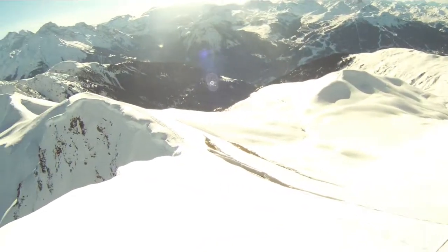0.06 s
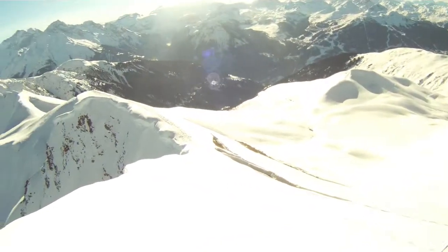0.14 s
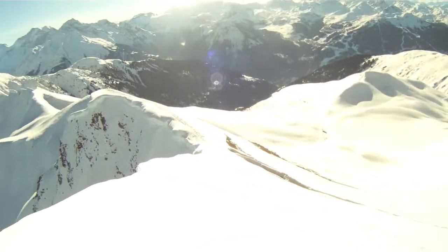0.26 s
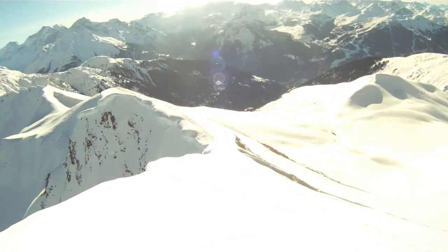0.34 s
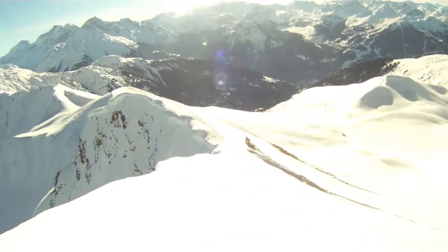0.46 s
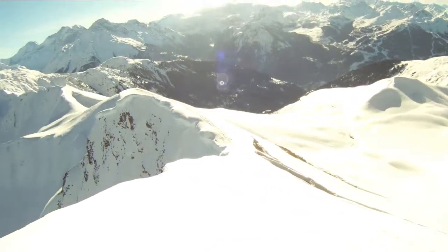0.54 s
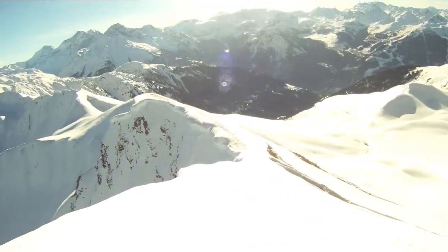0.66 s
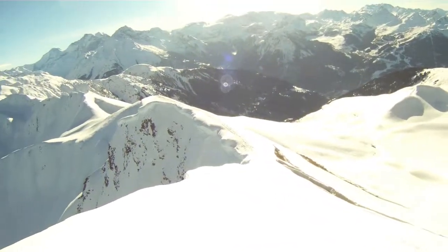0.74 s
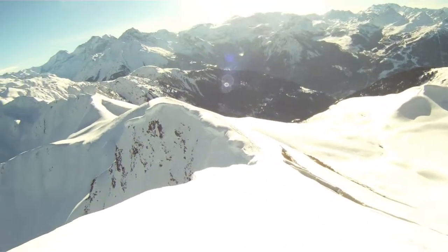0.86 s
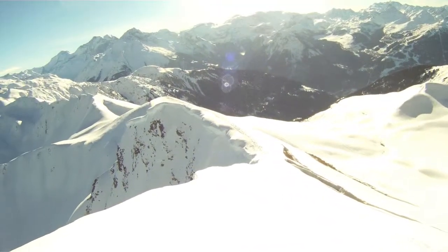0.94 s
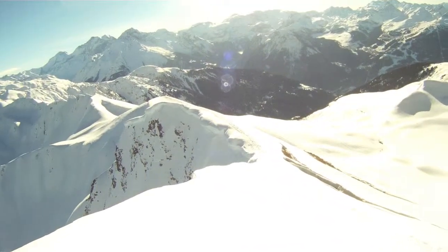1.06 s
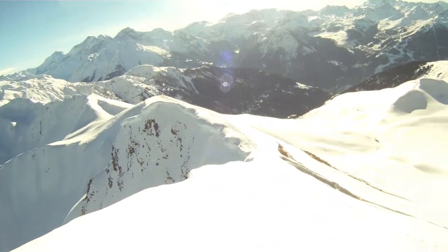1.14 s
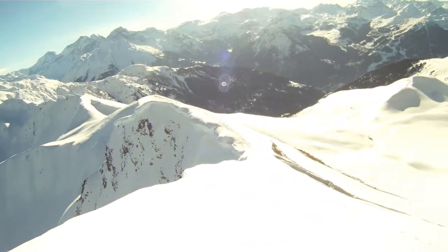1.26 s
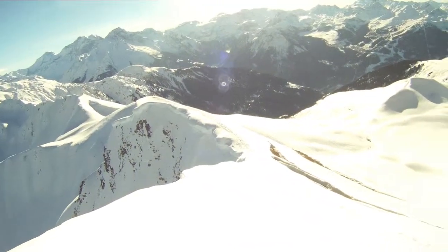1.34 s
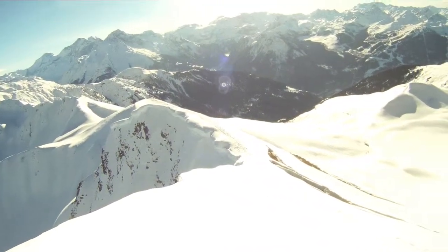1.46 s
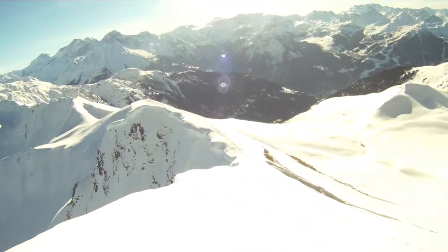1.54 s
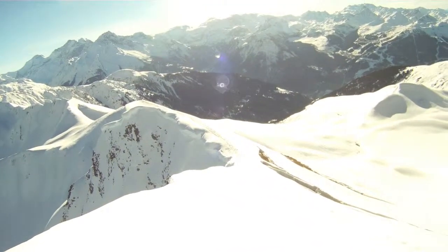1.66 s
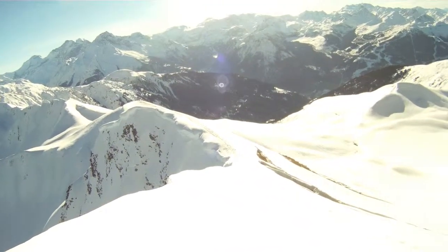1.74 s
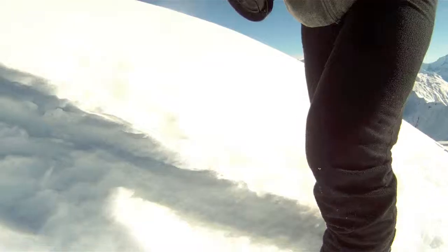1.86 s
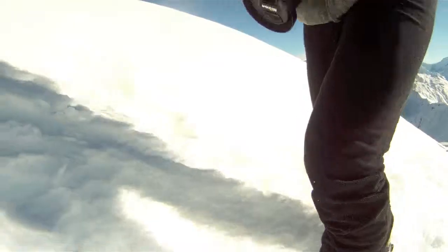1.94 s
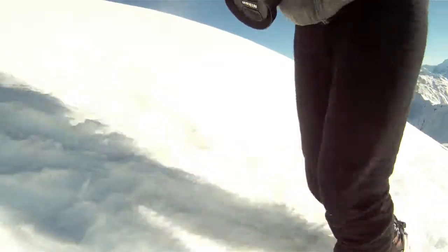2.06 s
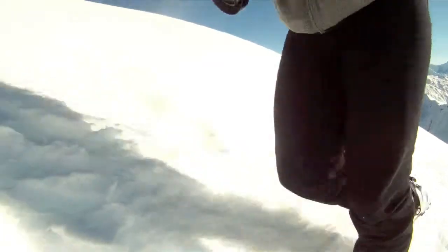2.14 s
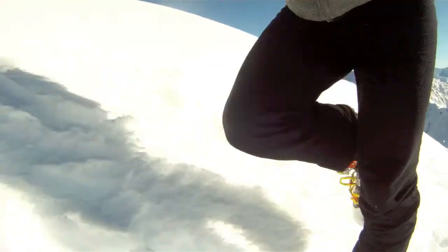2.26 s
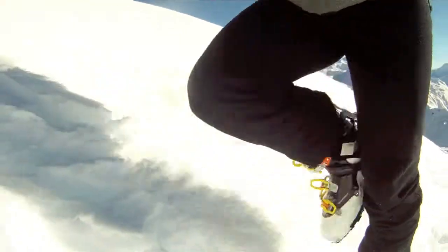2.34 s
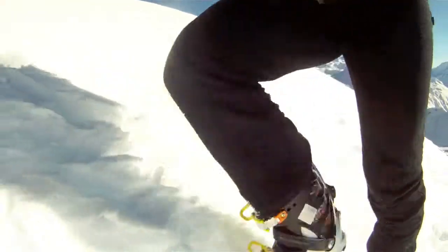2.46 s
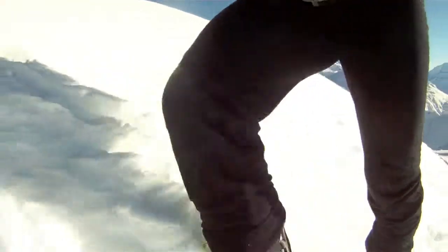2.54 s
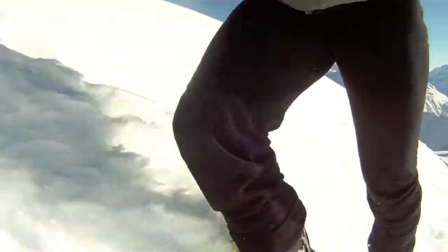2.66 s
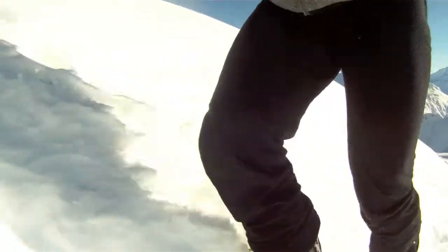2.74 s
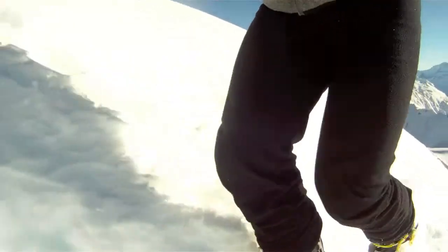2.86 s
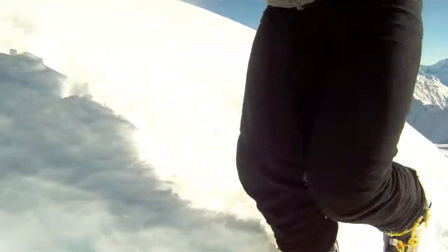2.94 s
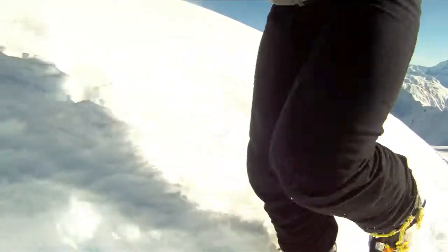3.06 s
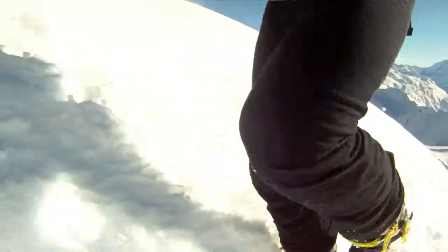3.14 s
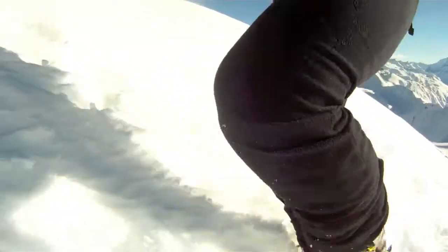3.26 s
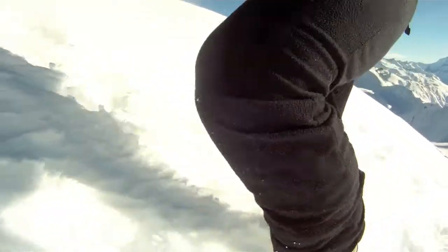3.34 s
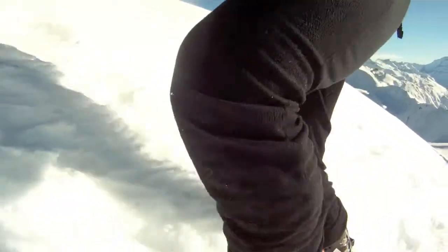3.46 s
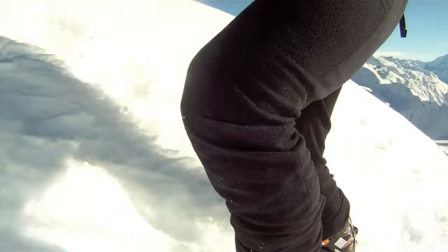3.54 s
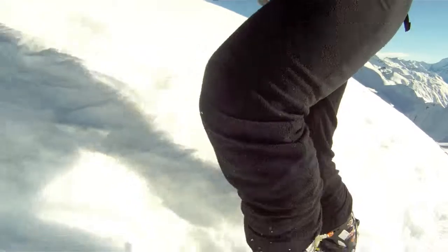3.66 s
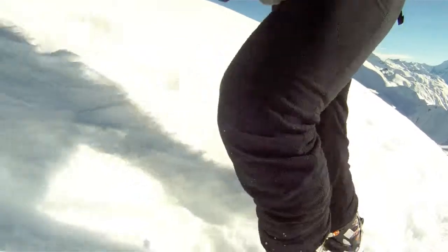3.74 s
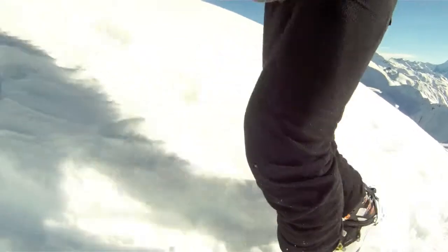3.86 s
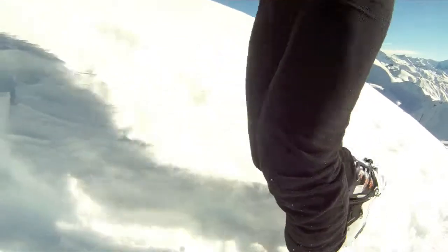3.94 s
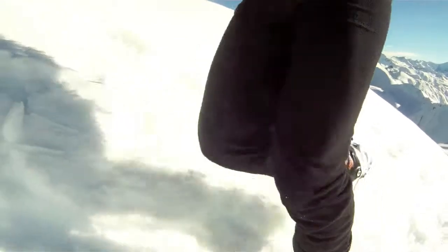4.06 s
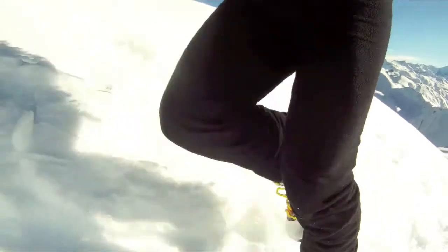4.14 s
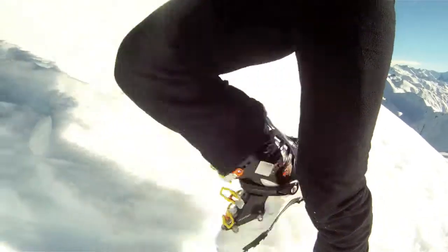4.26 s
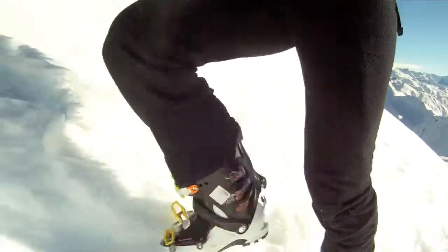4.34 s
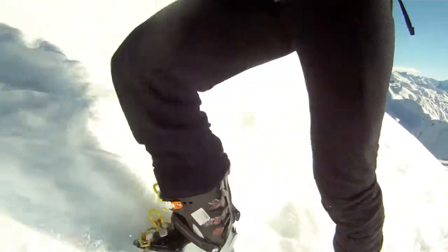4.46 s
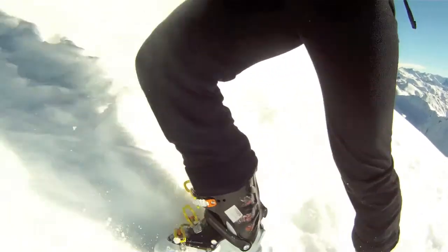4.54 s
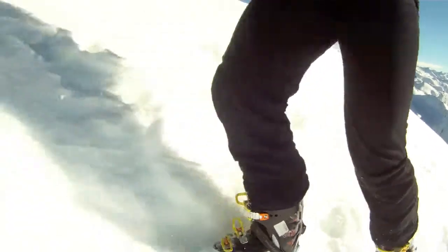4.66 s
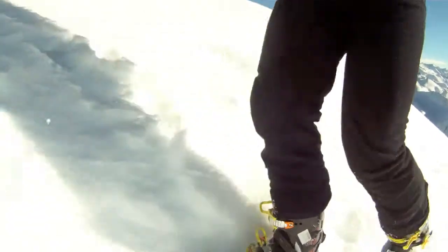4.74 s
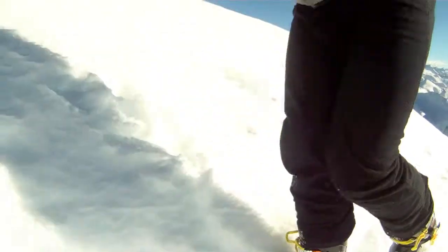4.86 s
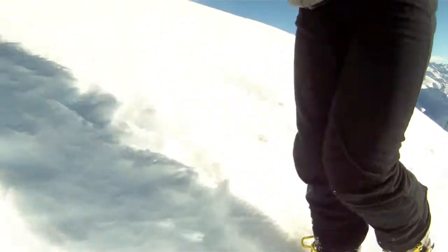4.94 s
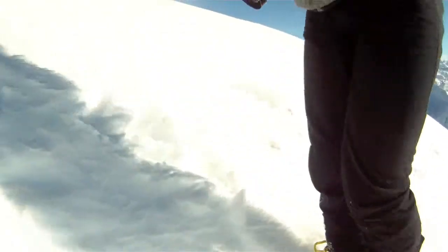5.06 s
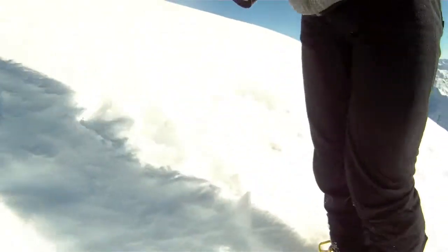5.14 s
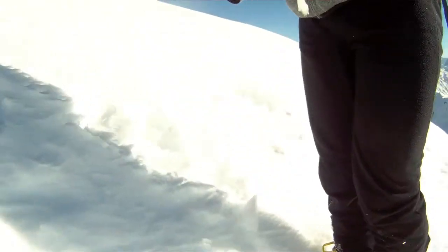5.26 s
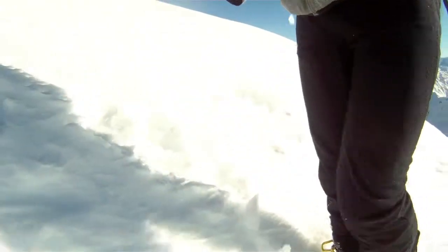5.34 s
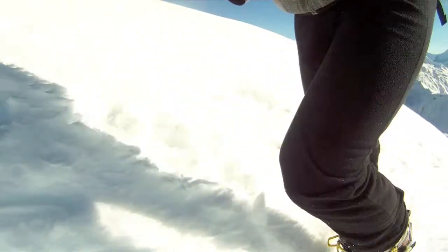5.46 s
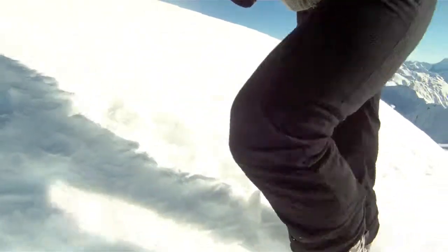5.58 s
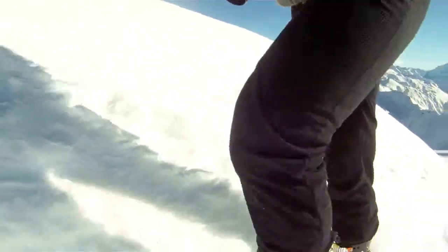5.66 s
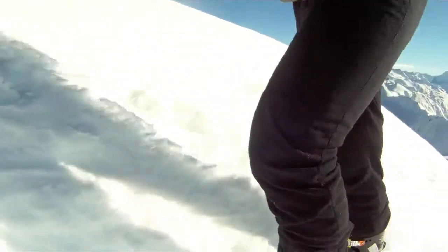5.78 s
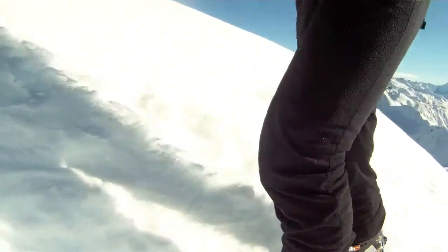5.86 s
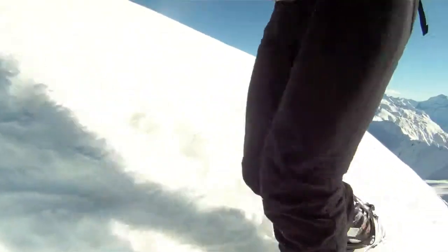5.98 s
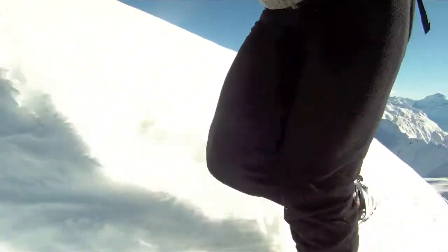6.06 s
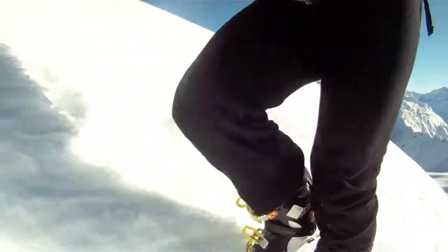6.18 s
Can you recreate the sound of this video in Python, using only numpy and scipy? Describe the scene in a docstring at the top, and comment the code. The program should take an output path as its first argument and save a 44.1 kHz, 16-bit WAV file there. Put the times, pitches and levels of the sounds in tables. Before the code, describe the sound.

For the first 1.8 seconds, clothing rubs softly against a small camera case, a scratchy patter with a few light knocks over faint wind and hiss. The background drops out briefly at about 1.9 seconds. From 2 seconds, boots crunch through crusted snow close by, much louder than the cloth. Each uneven step combines grainy crackle, sharp snaps and a dull thud with a low shudder. The strongest come at about 2 and 2.7 to 3 seconds, with more at 3.5 to 4, 4.5 to 4.9, 5.2 and 5.8 seconds. Small scrapes fall between them. A plastic boot buckle clicks near 3.3, 3.5, 5 and 6.2 seconds. Low wind continues under the steps, along with a very faint, distant hum. The sound is mono and boxy, heard through the closed case, with a gritty, slightly metallic treble.

```python
"""On a snowy slope, boots with crampons crunch through the crust, close to a small camera in a closed case.
First clothing rustles and knocks on the case. After a short fade the steps begin: snow crystals break,
the crust snaps, a buckle clicks and the ground thuds, over faint wind, hiss and a far hum.
The camera holds each of its 12000 samples a second, so the treble mirrors the lower sound."""
import sys
import numpy as np
from scipy import signal
from scipy.io import wavfile
from scipy.ndimage import uniform_filter1d

SR = 44100
rng = np.random.default_rng(int(sys.argv[2]) if len(sys.argv) > 2 else 0)


def generate_wav(sig):
    """Save sig (samples, or channels by samples) to the path in sys.argv[1] as 16-bit PCM at SR."""
    pcm = np.round(np.clip(np.atleast_2d(sig).T, -1, 1) * 32767).astype(np.int16)
    wavfile.write(sys.argv[1], SR, pcm)


N = 274081
TIME_S = np.arange(N) / SR

# Snow crushed under a boot: start_s, length_s, level_db, level_change_db, dull_offset_db
CRUNCH_BURSTS = [(1.968, 0.066, -45, 2, 1.5), (2.027, 0.067, -25, -16, 3), (2.102, 0.047, -33, -2, 2.5),
                 (2.15, 0.029, -37.5, -2, 7.5), (2.175, 0.0406, -33, 1, 0), (2.217, 0.049, -36, -13, 2),
                 (2.458, 0.15, -55.5, -8.5, -5.5), (2.679, 0.018, -33, -4.5, -13),
                 (2.694, 0.02, -29.5, 6, -0.5), (2.706, 0.023, -19.5, -11.5, -1.5),
                 (2.749, 0.0083, -25.5, -14, -7), (2.76, 0.17, -47.5, -15, 3),
                 (2.925, 0.051, -30.5, -23.5, 3.5), (2.971, 0.01, -31.5, 3.5, 8.5),
                 (2.985, 0.026, -41, 1.5, -8.5), (3.514, 0.043, -51, -3.5, 13),
                 (3.554, 0.097, -58, -1, 7.5), (3.65, 0.019, -45, 3, -6), (3.664, 0.045, -33, -6.5, 2),
                 (3.708, 0.072, -46, -2.5, 6), (3.779, .036, -45, 10, 4), (3.841, 0.024, -37, -8.5, 2.5),
                 (3.894, 0.029, -41.5, -17.5, 11), (3.968, 0.012, -37.5, -6.5, -2),
                 (3.984, 0.043, -40.5, -24, 4), (4.041, 0.018, -38, -29, -16),
                 (4.063, 0.063, -51, -24.5, -5), (4.549, .069, -28, -9, -3.5), (4.62, 0.038, -41, -4, 2.5),
                 (4.69, 0.12, -43.5, 3.5, 3.5), (4.805, 0.045, -34, -5.5, 1.5), (4.848, 0.023, -45, -7, 1),
                 (4.87, 0.052, -55.5, 2.5, 4), (5.156, 0.043, -31, -8, -0.5), (5.185, 0.028, -36.5, 13, -4),
                 (5.215, 0.022, -29.5, -5.5, 0.5), (5.238, 0.028, -45.5, -3.5, 4),
                 (5.322, 0.019, -52.5, -6.5, 5.5), (5.42, 0.049, -62, 5, 3), (5.465, 0.075, -52, -7.5, 4.5),
                 (5.835, 0.029, -25, -1, 1.5), (5.867, 0.023, -37, -8, 0.5), (6.016, 0.032, -54.5, -15, 13),
                 (6.042, 0.042, -54.5, -8, 3), (6.096, 0.016, -43, -3.5, 5.5)]
# Loose snow trickling between the crunches: time_s, level_db
LOOSE_SNOW = [(1.905, -96), (1.925, -65.5), (1.96, -56), (2.3, -64), (2.7, -65.5), (3.05, -67.5),
              (3.5, -72.5), (3.85, -53.5), (4.1, -70.5), (4.5, -71), (4.68, -56.5), (4.97, -64), (5.3, -62),
              (5.55, -70.5), (5.82, -61), (6.0, -62.5), (6.21, -67)]
# The tone of breaking snow, heard through the ringing camera case: pitch_hz, level_db
SNOW_CASE_TONE = [(450, -14.5), (800, -8), (1300, -6.5), (1900, -9.5), (2230, -5), (2480, -10.5),
                  (2900, -4.5), (3300, -11.5), (4000, -16), (4650, -19), (5100, -16), (5600, -20.5),
                  (6000, -26.5), (7500, -73)]
# The dull, low tone under snow and cloth: pitch_hz, level_db
DULL_TONE = [(45, -35), (90, -1), (150, -5.5), (260, 0), (380, -1.5), (500, 3.5), (620, 0.5), (720, -7),
             (850, -15), (1200, -36)]
# Short ringing ticks, first cloth knocking on the case, then snaps of the crust:
# start_s, level_db, pitch_hz, ring_s
RINGING_TICKS = [(0.3232, -44, 480, 0.012), (0.845, -40.5, 1570, 0.0059), (1.097, -34.5, 519, 0.012),
                 (1.3608, -28, 480, 0.012), (1.6886, -30, 387, 0.022), (1.605, -35, 2920, .008),
                 (2.0303, -15, 2560, 0.01), (2.0439, -14.5, 1530, 0.015), (2.06, -16, 2500, 0.0065),
                 (2.075, -18, 2880, 0.0076), (2.0855, -16.5, 556, 0.011), (2.098, -17, 2770, 0.0073),
                 (2.103, -14, 546, 0.0042), (2.15, -18, 530, 0.021), (2.176, -26, 1500, 0.0048),
                 (2.187, -14.5, 480, .012), (2.199, -20, 3020, .012), (2.484, -32, 1990, 0.014),
                 (2.5953, -31, 2820, 0.0055), (2.7489, -10.5, 590, 0.0033), (2.7605, -27, 4860, 0.0079),
                 (2.8042, -26, 511, 0.0044), (2.8105, -32, 600, 0.0044), (2.8943, -24, 452, 0.0068),
                 (2.9748, -8, 1310, 0.0094), (3.528, -29, 420, 0.013), (3.684, -15.5, 570, 0.0082),
                 (3.805, -19.5, 508, 0.022), (3.843, -25, 597, 0.011), (3.896, -27.5, 480, 0.016),
                 (3.9299, -21.5, 413, 0.0081), (4.0639, -30.5, 540, 0.021), (4.554, -26, 2270, 0.016),
                 (4.563, -17, 2970, 0.018), (4.613, -17, 1500, .005), (4.624, -32, 520, .01),
                 (4.634, -22, 2380, 0.0074), (4.7205, -31, 2820, 0.0065), (4.752, -23, 600, 0.009),
                 (4.786, -31, 2900, 0.0053), (4.807, -21, 560, 0.0045), (4.836, -21, 520, .01),
                 (5.1596, -21.5, 1000, 0.021), (5.183, -29, 2200, 0.0065), (5.47, -36.5, 2150, 0.013),
                 (5.9177, -24.5, 471, 0.0043), (5.9509, -38.5, 487, 0.024), (6.0315, -26.5, 506, 0.015),
                 (6.0745, -33, 433, 0.013)]
# The slope shaking under the walker's weight: start_s, shudder_db, thud_db
BOOT_THUMPS = [(2.05, -28, -23), (2.164, -29.5, -21), (2.714, -26.5, -10), (2.746, -31, -36),
               (2.943, -36, -40), (3.531, -39, -24.5), (3.686, -32.5, -31), (3.902, -33.5, -26.5),
               (3.983, -37.5, -24), (4.578, -34, -16), (4.817, -37, -28), (5.227, -37.5, -26),
               (5.844, -22, -14.5)]
# Scrapes that ring at one pitch: start_s, length_s, level_db, pitch_hz, width_hz
RINGING_SCRAPES = [(0.042, 0.033, -51, 3120, 400), (0.047, 0.023, -52, 5500, 400),
                   (2.339, 0.027, -55.5, 4540, 497), (2.433, 0.081, -59, 1990, 200),
                   (4.312, 0.017, -54, 585, 60), (4.434, 0.017, -53.5, 517, 199),
                   (3.662, .03, -61, 4840, 700), (4.081, .012, -53, 5160, 700),
                   (4.698, .16, -50.5, 4900, 500), (6.012, 0.042, -48.5, 2220, 300),
                   (6.095, 0.0071, -42, 2290, 593), (6.101, 0.016, -41.5, 500, 100)]
# Clicks of a boot buckle: start_s, level_db
BUCKLE_CLICKS = [(3.301, -35), (3.315, -37), (3.353, -49.5), (3.5, -43), (4.995, -34.5), (5.009, -37.5),
                 (6.192, -31.5), (6.201, -29)]
# The notes the buckle rings with: pitch_hz, offset_db, ring_s
BUCKLE_NOTES = [(1060, 8, .016), (800, -5, .04), (2000, -12, .015)]
# Cloth rubbing on the case: start_s, length_s, level_db, level_change_db, dull_offset_db
CLOTH_RUBS = [(.018, 0.016, -57, 0, -18), (.269, 0.032, -41.5, -15.5, -16.5), (.318, 0.013, -55, 5, 0.5),
              (.366, 0.025, -51, -4, -2.5), (.405, 0.016, -59, 8.5, 0), (.453, 0.016, -56, -5, -10),
              (.473, 0.021, -42, -13.5, 1), (.499, 0.052, -45, -20.5, -1.5), (.675, 0.06, -57, -7, -23),
              (.785, 0.075, -59, -3.5, -9.5), (1.088, 0.05, -54, -4, -4), (1.135, 0.044, -47, -8, -3.5),
              (1.318, 0.059, -52, 0.5, -4), (1.361, 0.078, -44, -26, 1), (1.49, 0.022, -52.5, 9.5, -5),
              (1.513, 0.038, -46, -11, -7), (1.586, 0.092, -46.5, -8, -7),
              (1.668, 0.027, -53.5, 11.5, -10.5), (1.698, 0.017, -44.5, -15, -5),
              (1.766, 0.034, -52, -28, -1)]
# Soft rustle between the rubs: time_s, level_db
SOFT_RUSTLE = [(0, -66), (.08, -65), (.25, -56), (.31, -65), (.55, -57), (.7, -54.5), (.75, -67.5),
               (.9, -69), (1.08, -51), (1.2, -60.5), (1.31, -70), (1.46, -63), (1.56, -56.5), (1.75, -57),
               (1.83, -67), (1.89, -79), (1.905, -92)]
# The tone of rubbing cloth, heard through the ringing camera case: pitch_hz, level_db
CLOTH_CASE_TONE = [(500, -28), (800, -10), (1100, -6), (1450, 0.5), (2000, -3), (2500, -2), (2950, 0.5),
                   (3400, -6.5), (3900, -4), (4500, -17), (5400, -4.5), (6000, -15), (7500, -67)]
# The wind rising and falling: time_s, level_db
WIND_LEVELS = [(0, -63.5), (.9, -65), (1.17, -60.5), (1.4, -62), (1.9, -58), (3.6, -62), (6.21, -58)]
# The tone of wind and hiss: pitch_hz, level_db
AIR_TONE = [(12, -43), (35, -1.5), (76, -0.5), (128, -4.5), (375, -8.5), (576, -11.5), (714, -19.5),
            (996, -20), (2190, -27.5), (2520, -28), (2980, -27.5), (5160, -26.5), (5950, -33), (7740, -58),
            (13100, -120)]
# The notes of the far hum: pitch_hz, level_db
HUM_NOTES = [(83, -59.5), (167, -65)]
# The dip in the background before the steps: time_s, gain_db
BACKGROUND_FADE = [(1.74, 5), (1.86, -3.5), (1.905, -27), (1.93, -7), (1.99, 2)]


def crunch():
    """Crystals break under the sole: a crackle, a high fizz and the dull sound of packed snow."""
    crackle, dull, fizz = burst_gains(CRUNCH_BURSTS, LOOSE_SNOW, fizz_db=-12.5,
                                      bed_dull_db=2, bed_fizz_db=-13)
    breaks = grains(per_s=6000, spread_db=2.5, clump_db=2.0, mush=0.84, cycles=3.6)
    lumps = grains(per_s=5000, spread_db=2.0, clump_db=2.0, mush=0.53, cycles=4.4)
    dull = uniform_filter1d(dull, size=200)  # packed snow answers more slowly
    return (crackle * colour(breaks, SNOW_CASE_TONE, high_hz=3330)
            + fizz * colour(breaks, SNOW_CASE_TONE, low_hz=4010)
            + dull * colour(lumps, DULL_TONE))


def ringing_ticks():
    """Cloth knocks on the case, later the crust snaps: each is a ring, a thin crack and a noisy spray."""
    rings, kicks, spray_gain = np.zeros((3, N))
    t = np.arange(300) / SR
    signs = np.sign(rng.standard_normal(len(RINGING_TICKS)))
    for (start_s, level_db, pitch_hz, ring_s), sign in zip(RINGING_TICKS, signs):
        add(rings, start_s, ring(level_db, pitch_hz, ring_s, rise_s=0.00049))
        add(kicks, start_s, [sign * gain_of(level_db)])
        add(spray_gain, start_s, gain_of(level_db - 60 * t / 0.023))
    cracks = np.sqrt(np.mean(kicks ** 2)) * colour(kicks, SNOW_CASE_TONE, high_hz=3850)
    spray = spray_gain * colour(rng.standard_normal(N), SNOW_CASE_TONE)
    return rings + gain_of(3) * cracks + gain_of(-18.5) * spray


def boot_thumps():
    """A short thud as the boot stops, and a low shudder of the slope just after it."""
    out = np.zeros(N)
    for start_s, shudder_db, thud_db in BOOT_THUMPS:
        add(out, start_s, ring(thud_db, pitch_hz=130.4, ring_s=0.03, rise_s=0.0015))
        add(out, start_s + 0.0072, ring(shudder_db, pitch_hz=34.5, ring_s=0.22, rise_s=0.0052))
    return out


def scrapes():
    """Rough rubbing makes one pitch ring for a moment."""
    out = np.zeros(N)
    for start_s, length_s, level_db, pitch_hz, width_hz in RINGING_SCRAPES:
        rub = rng.standard_normal(4000) * gain_of(0.73 * rng.standard_normal(4000))
        resonance = signal.iirpeak(pitch_hz, pitch_hz / width_hz, SR)
        ringing = signal.lfilter(*resonance, rub)[-round(length_s * SR):]  # 0.09 s at most
        soft_ends = signal.windows.tukey(len(ringing), 0.4)
        add(out, start_s, gain_of(level_db) * unit_level(ringing) * soft_ends)
    return out


def buckle():
    """A small plastic part knocks, rings briefly and bounces once."""
    knocks = np.zeros(N)
    for start_s, level_db in BUCKLE_CLICKS:
        for pitch_hz, offset_db, ring_s in BUCKLE_NOTES:
            add(knocks, start_s, ring(level_db + offset_db, pitch_hz, ring_s, rise_s=0.0013))
    bounces = np.zeros(N)
    add(bounces, start_s=0.007, sound=gain_of(-9.5) * knocks)
    return knocks + bounces


def clothing():
    """Cloth fibres rub on the case and make a dense patter of soft ticks."""
    bright, dull, fizz = burst_gains(CLOTH_RUBS, SOFT_RUSTLE, fizz_db=-13,
                                     bed_dull_db=-5, bed_fizz_db=-18.5)
    fibres = grains(per_s=4000, spread_db=3.0, clump_db=1.0, mush=1.0, cycles=6.5)
    return (bright * colour(fibres, CLOTH_CASE_TONE, high_hz=3680)
            + fizz * colour(fibres, CLOTH_CASE_TONE, low_hz=3550)
            + dull * colour(fibres, DULL_TONE, low_hz=119))


def wind():
    """Low, uneven gusts over a steady hiss."""
    gusts_db = np.interp(TIME_S, *np.transpose(WIND_LEVELS)) + 2 * wobble(samples=2500)
    rumble = gain_of(gusts_db) * colour(rng.standard_normal(N), AIR_TONE, high_hz=300)
    hiss = gain_of(-64) * colour(rng.standard_normal(N), AIR_TONE, low_hz=300)
    return rumble + hiss


def far_hum():
    """Two faint notes that waver in loudness and come in as the steps begin."""
    wavers = unit_level(uniform_filter1d(rng.standard_normal((len(HUM_NOTES), N)), size=3000))
    hum = sum(gain_of(level_db + 0.8 * waver) * np.sin(2 * np.pi * pitch_hz * TIME_S)
              for (pitch_hz, level_db), waver in zip(HUM_NOTES, wavers))
    return hum * (TIME_S > 1.9)


def grains(per_s, spread_db, clump_db, mush, cycles):
    """Tiny ticks of random size come in clumps, each ringing a few cycles, over a mush of noise."""
    sizes = gain_of(spread_db * np.minimum(rng.exponential(1, N), 4))
    kicks = sizes * np.sign(rng.standard_normal(N)) * (rng.random(N) < per_s / SR)
    pitches_hz = np.geomspace(90, 6000, num=22)
    pitch_index = rng.integers(0, len(pitches_hz), N)
    # each pitch comes and goes over about 20 ms
    patches = unit_level(uniform_filter1d(rng.standard_normal((len(pitches_hz), N // 128 + 1)), size=8))
    kicks *= gain_of(3.45 * patches[pitch_index, np.arange(N) // 128])
    t, ticks = np.arange(2048) / SR, np.zeros(N)
    for index, hz in enumerate(pitches_hz):
        tick = hz * np.exp(-3 * hz * t / cycles) * np.cos(2 * np.pi * hz * t)  # high ones die sooner
        ticks += signal.oaconvolve(kicks * (pitch_index == index), tick)[:N]
    clumps = gain_of(clump_db * wobble(samples=90))
    return (unit_level(ticks) + mush * rng.standard_normal(N)) * clumps


def burst_gains(bursts, bed, fizz_db, bed_dull_db, bed_fizz_db):
    """Loudness curves for the main, dull and fizzy parts: sudden bursts over a quiet bed of sound."""
    rise_s, crumble_s, crumble_share, usual_db = 0.0015, 0.0066, 0.37, -39
    bed_db = np.interp(TIME_S, *np.transpose(bed), left=-200, right=-200)
    power = gain_of([bed_db, bed_db + bed_dull_db, bed_db + bed_fizz_db]) ** 2
    for start_s, length_s, level_db, change_db, dull_db in bursts:
        times = TIME_S[round(start_s * SR):round((start_s + length_s) * SR)]
        progress = np.clip((times - start_s) / length_s, 0, 1)
        main_db = level_db + change_db * progress - 20 * np.exp(-progress * length_s / rise_s)
        # dull or heavy bursts fizz less
        fizz_offset_db = fizz_db - 0.55 * dull_db - 0.039 * (level_db - usual_db)
        burst_power = gain_of([main_db, main_db + dull_db, main_db + fizz_offset_db]) ** 2
        add(power.T, start_s, burst_power.T)
    gains = np.sqrt(power)
    decay = np.exp(-1 / (crumble_s * SR))
    crumbling = signal.lfilter([1 - decay], [1, -decay], gains)  # loose bits go on after a burst
    return uniform_filter1d(np.maximum(gains, crumble_share * crumbling), size=30)


def ring(level_db, pitch_hz, ring_s, rise_s):
    """A pure note that starts softly and dies away by 60 dB in ring_s."""
    t = np.arange(round(ring_s * SR) + 1) / SR
    loudness = gain_of(level_db - 60 * t / ring_s) * (1 - np.exp(-t / rise_s))
    return loudness * np.sin(2 * np.pi * pitch_hz * t)


def colour(sound, tone, low_hz=0, high_hz=SR):
    """Filters a sound by a tone table, keeps it between two pitches and sets its level to 1."""
    hz = abs(np.fft.fftfreq(8192, 1 / SR))
    tone_hz, tone_db = np.transpose(tone)
    shape_db = np.interp(np.log(hz + 1), np.log(tone_hz + 1), tone_db, left=-70, right=-70)
    shape_db -= 10 * np.log10(1 + (low_hz / (hz + 1)) ** 12)
    shape_db -= 10 * np.log10(1 + (hz / high_hz) ** 12)
    log_gain = np.log(gain_of(np.maximum(shape_db, -100)))
    response = np.exp(np.conj(signal.hilbert(log_gain)))  # rings after a hit, never before it
    taps = np.fft.ifft(response).real[:4096]
    return unit_level(signal.oaconvolve(sound, taps)[:N])


def wobble(samples):
    """A slow random drift: noise smoothed twice over this many samples."""
    return unit_level(uniform_filter1d(uniform_filter1d(rng.standard_normal(N), samples), samples))


def gain_of(db):
    """Turns decibels into a number to multiply by."""
    return 10 ** (np.asarray(db) / 20)


def unit_level(sound):
    """Scales a sound to an average (rms) level of 1."""
    return sound / np.sqrt(np.mean(sound ** 2) + 1e-20)


def add(mix, start_s, sound):
    """Adds a sound into the mix, cutting off whatever runs past the end."""
    start = round(start_s * SR)
    mix[start:start + len(sound)] += sound[:len(mix) - start]


def scene():
    """All sources in one channel; the background dips just before the steps."""
    nearby = crunch() + ringing_ticks() + scrapes() + buckle() + boot_thumps() + clothing()
    fade = gain_of(np.interp(TIME_S, *np.transpose(BACKGROUND_FADE)))
    return (nearby + fade * (wind() + far_hum()))[None]


def record(dry):
    """The camera repeats each sample, which mirrors low sound into the treble, then cuts the very top."""
    camera_rate_hz, repeats, top_hz = 12000, 4, 15400
    coarse = signal.resample_poly(dry, camera_rate_hz, SR, axis=1, window=("kaiser", 8))
    repeated = np.repeat(coarse, repeats, axis=1)
    held = signal.resample_poly(repeated, SR, camera_rate_hz * repeats, axis=1)[:, :N]
    top_cut = signal.firwin(161, top_hz, window=("kaiser", 7), fs=SR)
    return signal.oaconvolve(held, top_cut[None], "same")


dry = scene()
out = record(dry)
generate_wav(out)
```